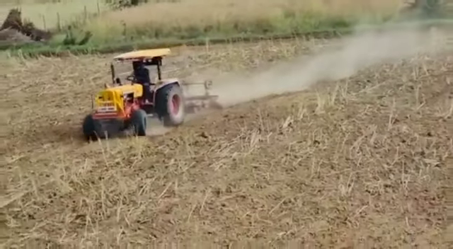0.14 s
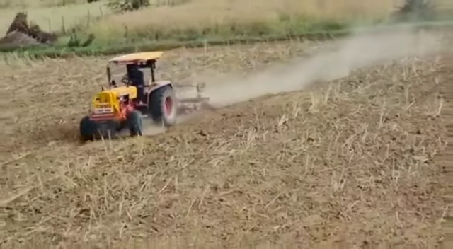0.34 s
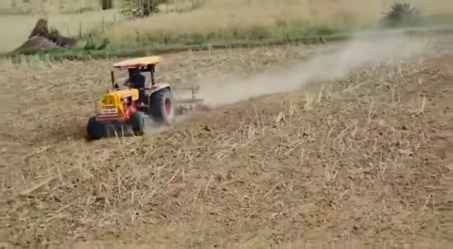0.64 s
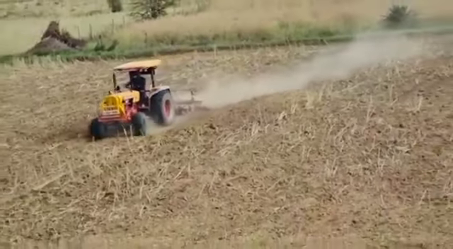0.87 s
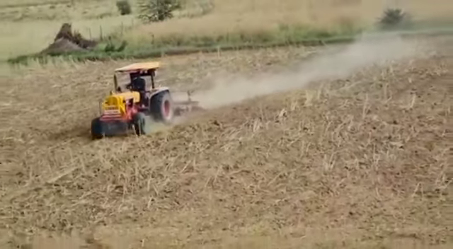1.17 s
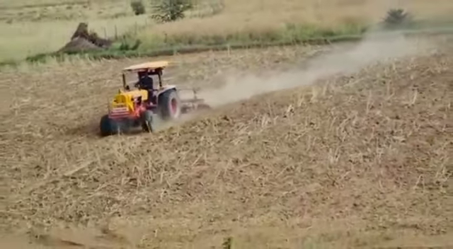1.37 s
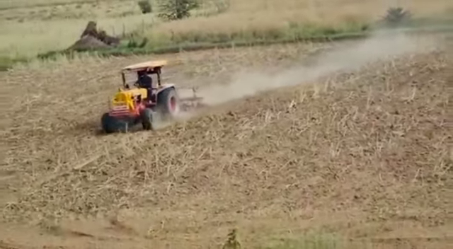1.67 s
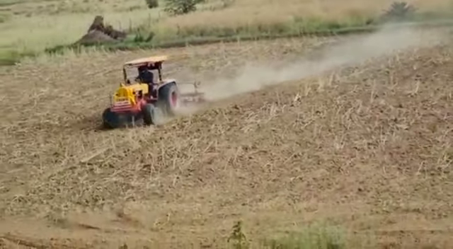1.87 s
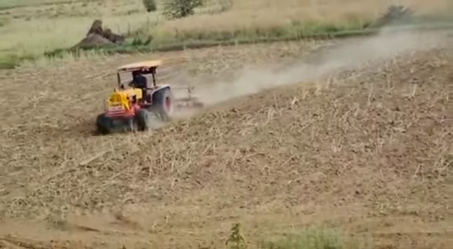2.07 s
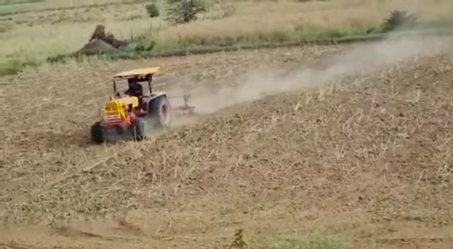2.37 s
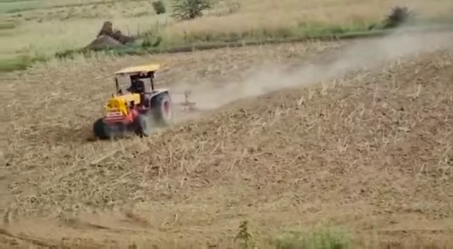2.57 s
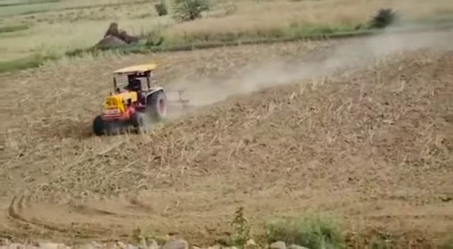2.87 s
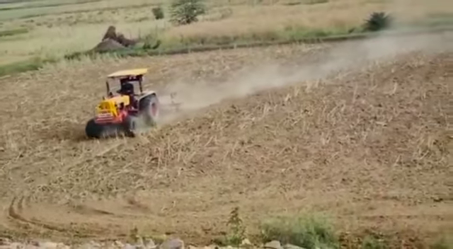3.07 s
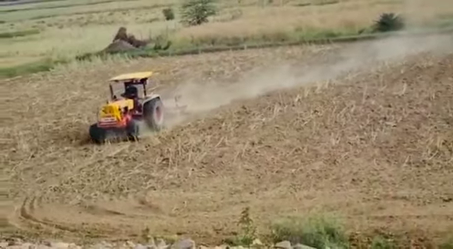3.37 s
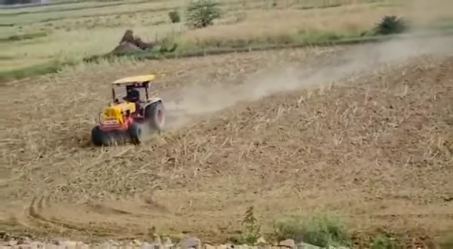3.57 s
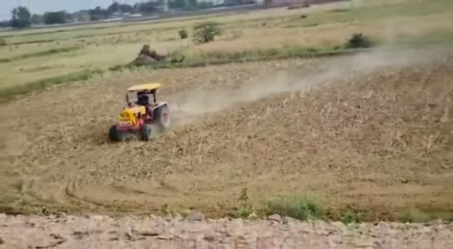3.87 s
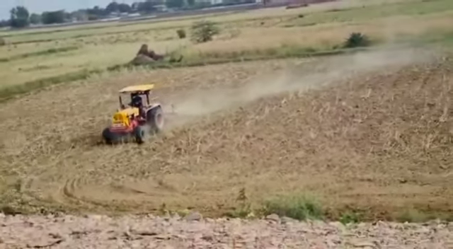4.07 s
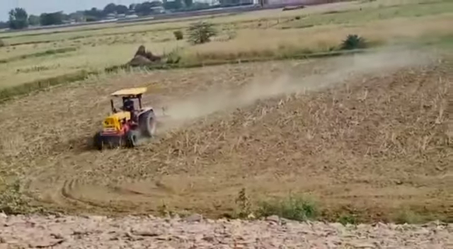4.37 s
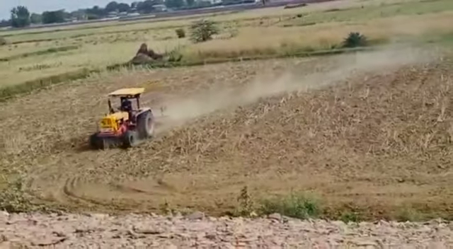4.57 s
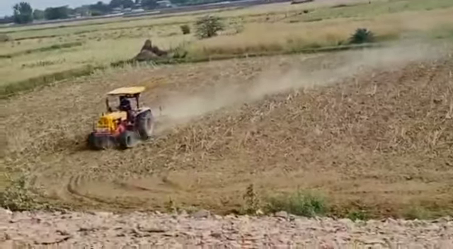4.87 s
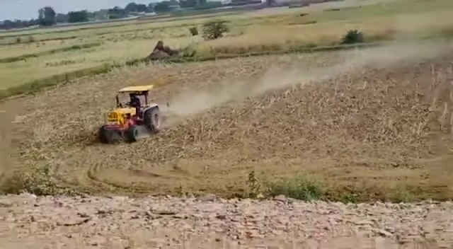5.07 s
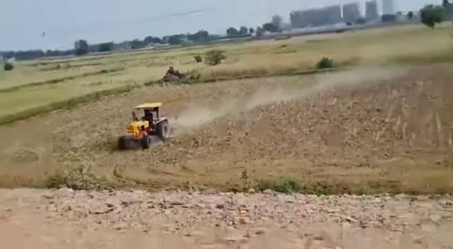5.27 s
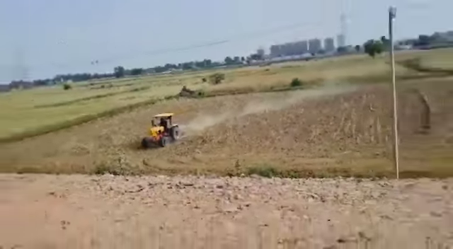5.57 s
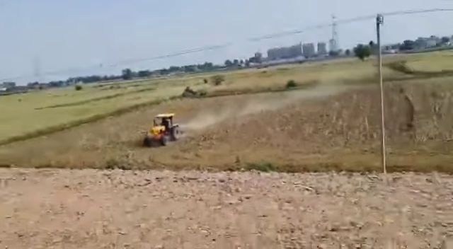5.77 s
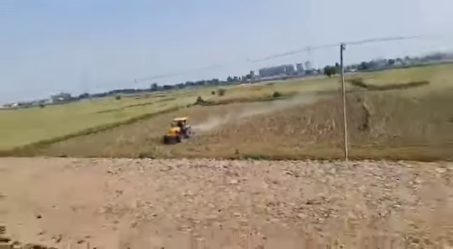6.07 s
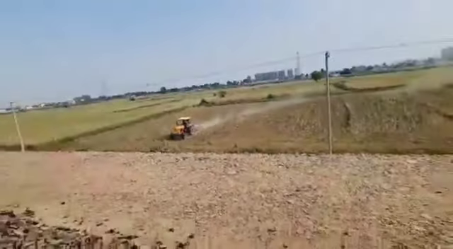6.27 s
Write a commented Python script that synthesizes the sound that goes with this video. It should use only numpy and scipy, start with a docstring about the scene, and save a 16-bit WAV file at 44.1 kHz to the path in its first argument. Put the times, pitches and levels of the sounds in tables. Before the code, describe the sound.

A hand-held phone picks up a tractor working a field at a distance: a steady diesel drone, fast exhaust puffs and the rumble of a harrow in the soil. Two short metallic rasps come first, and the sound briefly thins. Later the engine speeds up a little and then recedes, giving way to an even hiss and clusters of close, dull creaks and clicks from a finger on the right.

```python
"""A dry field, a hand-held phone, and some way off a four-cylinder diesel tractor pulling a harrow.
From the start the firings hum as clean low tones, exhaust gas puffs through the pipe's resonances and
the harrow rumbles in the soil. Two bright rasps pass, then the middle range dips for half a second.
Around five seconds in, the engine fades, a smooth hiss comes up, and a finger creaks over the
phone's case near the right microphone."""
import sys
import numpy as np
from scipy import signal
from scipy.fft import rfft, irfft, next_fast_len
from scipy.io import wavfile

SR = 44100
rng = np.random.default_rng(int(sys.argv[2]) if len(sys.argv) > 2 else 0)


def store_pcm(level_fs):
    """Save levels as 16-bit WAV."""
    pcm = np.round(np.clip(level_fs, -1, 1) * 32767).astype(np.int16)
    wavfile.write(sys.argv[1], SR, np.atleast_2d(pcm).T)


N = 282796
KNOCK_LAG_CYCLES = .35

# The four cylinders fire unequally. Each entry: one cylinder's level offset in dB.
CYLINDER_DB = [2, -2, 1.2, -1.2]
# The tractor's bearing from the phone. Each row: time in seconds, share seen side-on, share head-on.
BEARING = [(0, 1, 0.15), (.52, 0.81, 0.35), (.6, 0.65, 0.16), (.9, 0.83, 0.32), (1.5, 0.24, 0.14),
           (4.9, 0.038, 0.028), (5.5, 0.26, 0.53), (6.41, 0.04, 0.63)]


def from_db(db):
    """Gain of a level in dB."""
    return 10 ** (np.asarray(db) / 20)


def rms_one(x):
    """Scaled to unit rms."""
    return x / np.sqrt(np.mean(x ** 2) + 1e-20)


def in_time(rows):
    """Each column of a curve table, sample by sample."""
    seconds, *columns = np.transpose(rows)
    return [np.interp(np.arange(N) / SR, seconds, column) for column in columns]


def plateau(rise_s, full_s, fall_s, gone_s):
    """A ramp from 0 to 1, a hold and a ramp back."""
    return in_time([(rise_s, 0), (full_s, 1), (fall_s, 1), (gone_s, 0)])[0]


def drift(hz):
    """Slow random wander of spread 1: low-passed noise, drawn at every 40th sample."""
    pole = np.exp(-80 * np.pi * hz / SR)
    slow = signal.lfilter([1], [1, -2 * pole, pole * pole], rng.standard_normal(N // 40 + 2002))[2000:]
    return np.interp(np.arange(N) / 40, np.arange(len(slow)), rms_one(slow))


def butterworth(x, order, hz, kind="low"):
    """Low-, high- or band-pass filter."""
    return signal.sosfilt(signal.butter(order, hz, kind, fs=SR, output="sos"), x)


def resonate(x, hz, width_hz):
    """A resonance with gain 1 at its peak."""
    r = np.exp(-np.pi * width_hz / SR)
    feedback = [1, -2 * r * np.cos(2 * np.pi * hz / SR), r * r]
    return signal.lfilter([(1 - r * r) / 2, 0, (r * r - 1) / 2], feedback, x)


def coloured(colour):
    """Two unrelated noises with the given spectrum, rms 1."""
    size = next_fast_len(N)
    bin_hz = np.arange(1, size // 2 + 2) * SR / size
    hz, level_db = np.transpose(colour)
    shape = from_db(np.interp(np.log(bin_hz), np.log(hz), level_db))
    return rms_one(irfft(rfft(rng.standard_normal((2, size))) * shape, size)[:, :N])


def pan(db):
    """Left and right gains for a level of left over right in dB."""
    return np.array([from_db(db / 2), from_db(-db / 2)])


def order_tone(cycles, order):
    """A sine of rms 1 at a multiple of the firing rate."""
    return np.sqrt(2) * np.sin(2 * np.pi * (order * cycles + rng.random()))


def engine_hum(cycles, firing_hz, fade_db):
    """The firing tone, louder with speed, its overtones and the pipe's drone."""
    # Quarter orders come from unequal cylinders, steps of .86 from the belt-driven fan.
    # Each row: multiple of the firing rate, level in dB against the second order.
    overtones = [(1.75, -17), (2, 0), (2.25, -18), (2.58, -13), (3, -14), (3.44, -7.5), (4.5, -13),
                 (5, -13), (5.5, -19), (6, -16), (6.5, -18), (7.5, -21)]
    # Each row: time in seconds, level of the overtones in dB.
    overtone_levels = [(0, -28.5), (.8, -29.5), (1.6, -29.5), (2.6, -29), (3.4, -29.5), (4.0, -32),
                       (4.7, -30.5), (5.3, -38), (6.41, -36)]
    firing_db, growth_db_per_hz, right_lag_s = -17.5, .25, .00011
    speed_db = growth_db_per_hz * (firing_hz - firing_hz.mean())
    hum = from_db(firing_db + speed_db + .2 * fade_db + .6 * drift(5.9)) * order_tone(cycles, 1)
    overtone_db = in_time(overtone_levels)[0] + .5 * drift(4.8)
    for order, level_db in overtones:
        waver_db = .6 * (order - 1) * drift(2.9)   # moving air shakes higher tones more
        dip_db = (order > 5) * midrange_dip(depth_db=-14)
        hum += from_db(overtone_db + level_db + waver_db + dip_db) * order_tone(cycles, order)
    hum += pipe_drone(cycles, firing_hz, fade_db)
    right = np.interp(np.arange(N) - right_lag_s * SR, np.arange(N), hum)
    return np.array([hum, right]) * pan(-.8 + .9 * drift(6.2))   # the hand sways


def pipe_drone(cycles, firing_hz, fade_db):
    """The pipe drones when an engine order passes through its lowest mode; gas rings it faintly."""
    # Each entry: an order that can meet the mode, as a multiple of the firing rate.
    orders = [3.75, 4, 4.25, 4.5]
    # Each entry: that order's level in dB when on the mode, before the fade.
    on_mode_db = [-27, -32.5, -25.5, -31.5]
    pipe_hz, width_hz, gas_db = 274.5, 9, -34
    drone = np.zeros(N)
    for order, level_db in zip(orders, on_mode_db):
        nearness = 1 / (1 + np.abs(2 * (order * firing_hz - pipe_hz) / width_hz) ** 4)
        drone += from_db(level_db) * nearness * order_tone(cycles, order)
    drone += from_db(gas_db) * rms_one(resonate(rng.standard_normal(N), pipe_hz, width_hz))
    return from_db(2.14 * fade_db + 1.6 * drift(21)) * drone


def knocking_gas(cycles):
    """Two turbulent noises as analytic signals; the first carries one sharp diesel knock a firing."""
    # The hardest knocks. Each row: time in seconds, level in dB against the gas noise.
    hard_knocks = [(.594, 33), (2.377, 35), (3.352, 35)]
    knock_db, spread_db, jitter_cycles = 28.5, 1.6, .025
    count = int(cycles[-1]) + 2
    gas = rng.standard_normal((2, next_fast_len(N)))
    knock_cycles = np.arange(count) + KNOCK_LAG_CYCLES + rng.normal(0, jitter_cycles, count)
    at = np.minimum(np.searchsorted(cycles, knock_cycles), N - 1)
    levels_db = knock_db + np.resize(CYLINDER_DB, count) + rng.normal(0, spread_db, count)
    gas[0, at] += from_db(levels_db) * rng.choice([-1, 1], count)
    for seconds, level_db in hard_knocks:
        gas[0, int(seconds * SR)] += from_db(level_db)
    return signal.hilbert(gas)[:, :N]


def mode_pair(drive, hz, width_hz, wander_db):
    """One roar mode: two close resonances whose balance wanders."""
    split_hz = .45 * width_hz
    broad = resonate(drive, hz, 1.8 * width_hz)   # darkens the valleys between modes
    lean = from_db(wander_db * drift(3))
    upper = resonate(broad, hz + split_hz, width_hz)
    lower = resonate(broad, hz - split_hz, width_hz)
    return (lean * upper - lower / lean) / np.sqrt(lean ** 2 + lean ** -2)


def exhaust_roar(cycles, fade_db, strength_db):
    """Turbulent gas, swelling once a firing with a strength of its own, rings pipe and bonnet modes."""
    # Each row: pitch in Hz, width in Hz, relative level in dB, left over right in dB, left-right
    # likeness, puff depth in dB, puff lag in cycles, change side-on in dB, change head-on in dB.
    modes = [(683, 38, -3.5, 2, 0.91, 1, 0.011, 2, 4.5), (786.9, 100, 0.5, -1.5, 0.99, -3.4, .01, 5, 2),
             (939, 183, -14, 19.5, 0.55, -4, 0.056, -16.5, 12.5),
             (1114, 106, -20, 4, 0.15, -4.5, 0.0083, 16.5, -5.5),
             (1335, 160, -5.5, 1.1, 1, -6.5, 0.047, 2.5, 0.5),
             (1652, 174, -16, -5.5, 0.62, -1.5, 0.4, 11.5, 3), (1874, 100, -8.5, -1, 1, 3, 0.35, -4, -3.5),
             (2047, 207, -18.5, -2, 0.42, -2, 0.19, 2, 11.5), (2446, 140, -16.5, -5, 0.33, 2, 0.049, 5, -6),
             (2669, 144, -25.5, -9, 0.061, 3, 0.09, 15.5, 4.5),
             (2965, 112, -13.5, -8.5, 0.27, 2.5, 0.022, -4, -16),
             (3235, 150, -16, 2, 0.68, -6, 0.045, -23.5, 4.5),
             (3727, 214, -21, -2, 0.047, 1, 0.092, 2.5, -3.5),
             (4150, 190, -30.5, 13, 0.66, -3, 0.038, -15.5, 7),
             (4660, 140, -29.5, 9.5, 0.44, -2.5, 0.037, -1.5, 2),
             (5090, 150, -29.5, -6, 0.58, 7, .05, 6, 4), (5700, 310, -19, 2.5, 0.15, -1.5, 0.059, -1, 0.5),
             (6320, 210, -17, 7, 0.26, -1.5, .05, 1, 3)]
    # Each entry: phase in radians by which the right microphone leads on that mode.
    right_leads = [-.2, -.3, -.7, -1.1, -.4, 2.9, 1.2, 0, -.8, -1.4, 1.3, 3, -.6, -2.8, 1.5, 3, .3, 2.1]
    # Each row: time in seconds, level of the high modes in dB, left over right of all modes in dB.
    level_and_side = [(0, -20, -5), (.3, -22, -2.5), (.5, -21.5, -2), (1.1, -22, -1), (1.6, -19, -1),
                      (3.0, -20, -1.5), (3.5, -18.5, -2.5), (3.9, -16.5, -0.5), (4.5, -20, -1.5),
                      (4.87, -17.5, -1.5), (5.3, -21.5, -2), (5.7, -23, -1), (6.41, -25, -2)]
    # The high modes slide up as the phone turns away. Each row: time in seconds, share of pitch.
    mode_glide = [(0, 0), (4.3, 0.002), (5.0, 0.0098), (5.6, .02), (6.41, 0.017)]
    # Each row: time in seconds, level offset in dB of the modes above treble_hz.
    treble_levels = [(0, -2), (1.2, -0.5), (2.4, -2), (3.0, 0.5), (3.6, -1), (4.6, 0), (5.2, -2), (5.6, 0),
                     (6.41, -3)]
    bottom_hz, treble_hz, top_hz = 470, 3100, 6944.4
    high_db, pan_db = in_time(level_and_side)
    high_db += midrange_dip(depth_db=-3.5)
    low_db = -26 + fade_db
    side_on, head_on = in_time(BEARING)
    glide, treble_db = in_time(mode_glide)[0], in_time(treble_levels)[0]
    gas = knocking_gas(cycles)
    roar = np.zeros((2, N))
    for mode, lead in zip(modes, right_leads):
        hz, width_hz, level_db, side_db, alike, depth_db, lag, side_on_db, head_on_db = mode
        highness = np.clip(np.log2(hz / 900), 0, 1)   # 0 for low modes, 1 from 1800 Hz up
        phase = 2 * np.pi * (cycles - lag)
        puff = np.sin(phase) + .12 * np.sin(2 * phase)   # a lopsided swell
        puff_db = depth_db * puff + (.077 + .24 * highness) * strength_db
        right = alike * gas[0] * np.exp(1j * lead) + np.sqrt(1 - alike ** 2) * gas[1]
        drive = from_db(puff_db) * np.array([gas[0], right])
        ring = mode_pair(drive, hz, width_hz, wander_db=1.3 * (1 + highness))
        shift_hz = hz * highness * (glide + .008 * drift(4))
        ring = (ring * np.exp(2j * np.pi * np.cumsum(shift_hz) / SR)).real
        level_db += (1 - highness) * low_db + highness * high_db + .7 * drift(17.4)
        level_db += side_on_db * side_on + head_on_db * head_on + (hz > treble_hz) * treble_db
        roar += rms_one(ring) * from_db(level_db) * pan(side_db + pan_db)
    roar = signal.sosfilt(signal.cheby2(6, 30, bottom_hz, "high", fs=SR, output="sos"), roar)
    return signal.sosfilt(signal.cheby2(6, 40, top_hz, fs=SR, output="sos"), roar)


def machinery_rasps(cycles):
    """Short bright bursts from the machinery, right of centre, throbbing with the firings."""
    # Each row: start in seconds, end in seconds, level in dB.
    rasps = [(0, .14, -35), (.42, .535, -35)]
    band_hz, edge_s, throb_db, side_db = [2490, 3380], .016, 2, -4.5
    envelope = sum(from_db(level_db) * plateau(start_s - edge_s, start_s, end_s, end_s + edge_s / 2)
                   for start_s, end_s, level_db in rasps)
    noise = from_db(throb_db * np.sin(2 * np.pi * cycles)) * rng.standard_normal((2, N))
    return envelope * rms_one(butterworth(noise, 3, band_hz, "band")) * pan(side_db)[:, None]


def treble_hiss(cycles, strength_db):
    """Thin treble that throbs with the firings and flickers band by band, its own in each microphone."""
    # Each row: time in seconds, level in dB.
    levels = [(0, -60.5), (1.0, -56), (1.3, -61.5), (1.7, -54.5), (2.75, -59), (3.11, -53.5), (4.52, -53),
              (4.93, -47.5), (5.2, -55), (6.41, -52)]
    # Each row: frequency in Hz, relative spectral level in dB.
    colour = [(6700, -7), (7500, -53), (8700, 1), (9600, -7), (10700, 2.5), (11500, -2), (12200, 1.5),
              (13000, 15.5), (13300, -8.5), (13800, -31)]
    noise, edges_hz = coloured(colour), np.geomspace(6500, 14000, 9)
    hiss = np.zeros((2, N))
    for band_hz in zip(edges_hz, edges_hz[1:]):
        flicker_db = 1.6 * drift(16) + 1.4 * np.array([drift(20), drift(20)])
        hiss += from_db(flicker_db) * butterworth(noise, 2, band_hz, "band")
    throb_db = .57 * strength_db + 1.6 * np.sin(2 * np.pi * cycles)
    return from_db(in_time(levels)[0] + throb_db) * rms_one(hiss)


def harrow(fade_db):
    """Harrow and tyres rumble in the soil; above that the tines scrape, louder when seen side-on."""
    # Each row: frequency in Hz, relative spectral level in dB.
    soil_colour = [(20, -8), (45, 5), (85, 10.5), (110, 2.5), (135, 6), (200, 2.5), (250, 4), (305, 10.5),
                   (350, -2), (410, -2.5), (480, -12), (600, -1.5), (1000, -5), (2500, -31), (6000, -52.5),
                   (7500, -76)]
    scrape_from_hz, bright_from_hz = 332.5, 490
    mid, side = coloured(soil_colour)
    soil = mid + from_db(-15) * side * [[1], [-1]]   # nearly alike in both microphones
    rumble = butterworth(soil, 8, scrape_from_hz)
    scrape = butterworth(soil, 8, scrape_from_hz, "high")
    dull = from_db(midrange_dip(depth_db=-19)) * butterworth(scrape, 5, bright_from_hz)
    bright = from_db(midrange_dip(depth_db=-4.5)) * butterworth(scrape, 5, bright_from_hz, "high")
    side_on = in_time(BEARING)[0]
    rumble_db = -28 + .088 * fade_db + drift(5.4)
    scrape_db = -22.5 + 6.5 * side_on + .32 * fade_db + 2.2 * drift(2.2)
    return from_db(rumble_db) * rumble + from_db(scrape_db) * (dull + bright)


def midrange_dip(depth_db):
    """Level change in dB as the middle range dips briefly."""
    start_s, end_s, edge_s = .515, 1.006, .03
    return depth_db * plateau(start_s, start_s + edge_s, end_s - edge_s, end_s)


def smooth_hiss():
    """Broad, even noise that comes up late, its own in each microphone."""
    # Each row: time in seconds, level in dB.
    levels = [(0, -73), (4.6, -64), (5.2, -43.5), (5.7, -44.5), (6.41, -41)]
    # Each row: frequency in Hz, relative spectral level in dB.
    colour = [(1500, -20.5), (2800, 6), (4300, -5), (5500, -7.5), (7000, -16.5), (8200, -23.5),
              (10000, -39)]
    return from_db(in_time(levels)[0] + drift(6)) * coloured(colour)


def skin_rub():
    """Dull and bright envelopes of the skin dragging over the case between slips."""
    # Each row: start in seconds, end in seconds, dull rub in dB, bright rub in dB.
    creaks = [(5.28, 5.36, -38, -66), (6.02, 6.05, -31, -66), (6.10, 6.17, -28, -59)]
    edge_s = .02
    dull, bright = np.zeros((2, N))
    for start_s, end_s, dull_db, bright_db in creaks:
        swell = plateau(start_s - edge_s, start_s, end_s, end_s + edge_s)
        dull += from_db(dull_db) * swell
        bright += from_db(bright_db) * swell
    return dull, bright


def finger_creak():
    """Each slip is a dull knock in the heavily damped case with a faint bright edge, on the right."""
    # Each row: time in seconds, peak in dB, bright edge in dB.
    slips = [(5.2825, -10, -46), (5.3, -6.5, -48), (5.3105, -3, -39), (5.3205, -4, -29), (5.3361, -4, -35),
             (5.3479, -3.5, -37), (5.3615, -4.5, -42), (5.401, -3.5, -43), (5.42, -4, -46),
             (5.4391, -5, -43), (5.466, -5.5, -46), (5.4888, -10, -38), (5.5032, -13, -50),
             (5.523, -5.5, -31), (5.5372, -10, -28), (5.5664, -11, -44), (5.5762, -18, -32),
             (5.6195, -10, -32), (5.6347, -18, -37), (5.6427, -20, -29), (5.715, -11, -29),
             (5.7621, -9.5, -25), (5.8156, -9, -24), (6.0215, -7.5, -34), (6.0275, -7.5, -38),
             (6.0317, -9.5, -48), (6.0371, -10.5, -48), (6.0428, -12, -50), (6.049, -10.5, -50),
             (6.0657, -6, -42), (6.0718, -6, -32), (6.0791, -8, -47), (6.0867, -9, -38), (6.0935, -7, -35),
             (6.0999, -9, -42), (6.1036, -12, -32), (6.1139, -14, -23), (6.1222, -5.5, -27),
             (6.1299, -4.5, -26), (6.1352, -4.5, -32), (6.1401, -4.5, -33), (6.1479, -5, -22),
             (6.155, -3.5, -29), (6.1627, -3.5, -31), (6.1749, -3.5, -29), (6.1825, -1, -27),
             (6.2081, -13, -23), (6.2166, -18, -30), (6.2232, -1.5, -20), (6.2324, -14, -31),
             (6.2425, -12, -39), (6.2472, -1, -22), (6.3354, -12, -35), (6.3446, -13, -32),
             (6.3487, -3, -21), (6.3688, -6, -23), (6.3935, -.5, -20)]
    # Each row: frequency in Hz, relative spectral level of the bright edge in dB.
    edge_colour = [(2000, -5), (3500, 8), (5500, 2), (7000, -8), (9000, -9), (12500, -3), (13500, -17),
                   (14000, -30)]
    case_band_hz, case_top_hz, edge_decay_s, left_db = [520, 1850], 3100, .0008, -26
    seconds, peak_db, edge_db = np.transpose(slips)
    case = np.vstack([signal.butter(2, case_band_hz, "band", fs=SR, output="sos"),
                      signal.butter(4, case_top_hz, fs=SR, output="sos")])
    knock = signal.sosfilt(case, signal.unit_impulse(256))
    peak_delay = np.argmax(np.abs(signal.hilbert(knock)))
    at = np.round(seconds * SR).astype(int) - peak_delay
    clicks, edges = np.zeros((2, N))
    clicks[at] = from_db(peak_db) * rng.choice([-1, -1, -1, 1], len(at))   # mostly inward
    edges[at] = from_db(edge_db)
    edges = signal.lfilter([1], [1, -np.exp(-1 / (edge_decay_s * SR))], edges)
    dull_rub, bright_rub = skin_rub()
    fizz = (edges + bright_rub) * coloured(edge_colour)
    body = np.convolve(clicks, knock / np.abs(knock).max())[:N]
    body += signal.sosfilt(case, dull_rub * rng.standard_normal(N)) / np.sqrt(np.sum(knock ** 2))
    return (body + fizz) * from_db([[left_db], [0]])


def scene():
    """Engine and harrow out in the field, a smooth hiss, and the finger close by."""
    # Engine speed. Each row: time in seconds, firings per second.
    speed = [(0, 66.9), (0.5, 66.3), (0.9, 66.2), (1.1, 66.6), (1.5, 65.8), (2.1, 64.1), (2.5, 63.4),
             (2.9, 63.2), (3.1, 63.9), (3.4, 63.9), (3.7, 65.4), (4.1, 67.2), (4.3, 67.4), (4.9, 70.9),
             (5.3, 72.2), (5.5, 72.0), (5.7, 70.6), (6.41, 69.6)]
    # The tractor fades late on, each layer by its own multiple. Each row: time in seconds, level in dB.
    fade = [(0, -2), (4.9, 2), (5.35, -7), (5.9, -9), (6.41, -10)]
    firing_hz, fade_db = in_time(speed)[0], in_time(fade)[0]
    cycles = np.cumsum(firing_hz) / SR   # one cycle a firing
    count = int(cycles[-1]) + 2
    firing_db = np.resize(CYLINDER_DB, count) + rng.normal(0, 2, count)
    strength_db = np.interp(cycles, np.arange(count) + KNOCK_LAG_CYCLES, firing_db)
    engine = engine_hum(cycles, firing_hz, fade_db) + exhaust_roar(cycles, fade_db, strength_db)
    engine += machinery_rasps(cycles) + treble_hiss(cycles, strength_db)
    return engine + harrow(fade_db) + smooth_hiss() + finger_creak()


def record(dry):
    """The sound opens within a moment, the highest peaks are rounded, the top is cut steeply."""
    fade_in_s, cutoff_hz = .002, 13900
    opened = dry * in_time([(0, 0), (fade_in_s, 1)])[0]
    rounded = opened / (1 + np.abs(opened) ** 6) ** (1 / 6)
    return signal.sosfilt(signal.cheby2(12, 70, cutoff_hz, fs=SR, output="sos"), rounded)


dry = scene()
out = record(dry)
store_pcm(out)
```